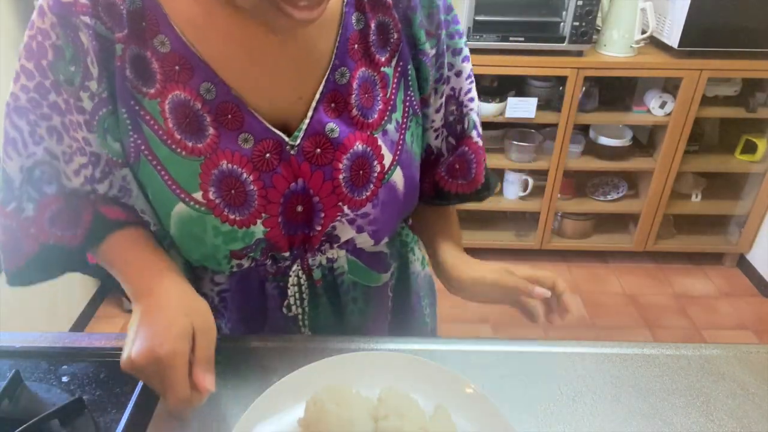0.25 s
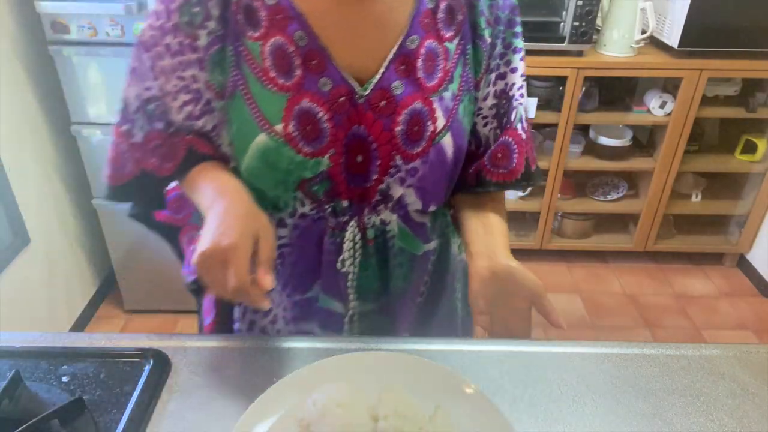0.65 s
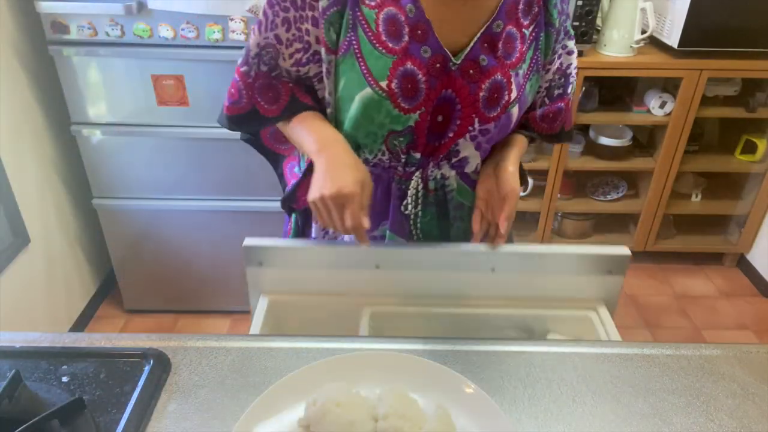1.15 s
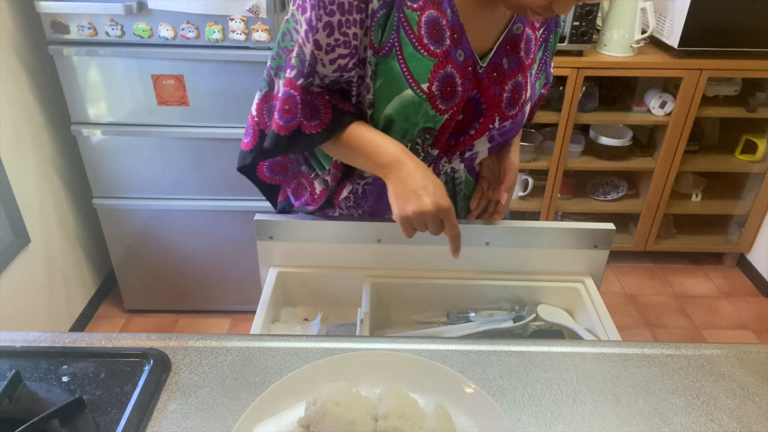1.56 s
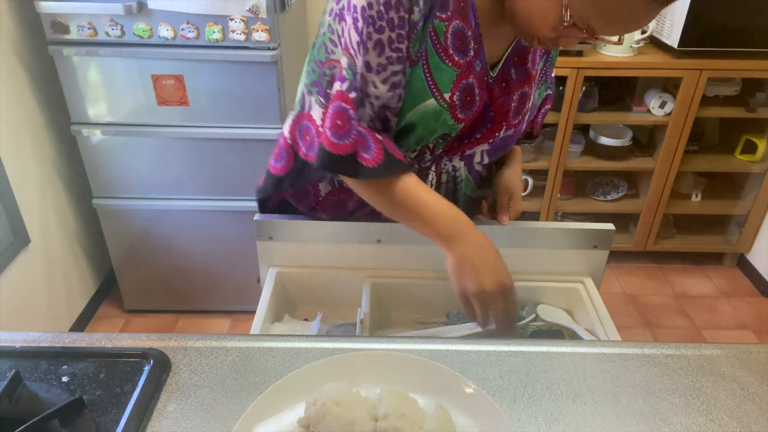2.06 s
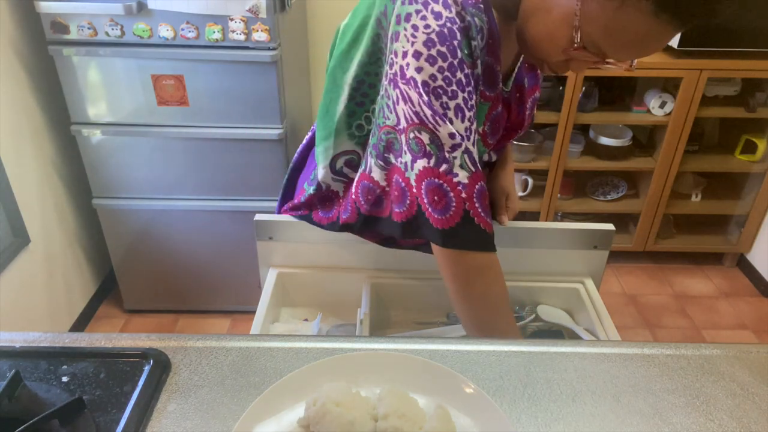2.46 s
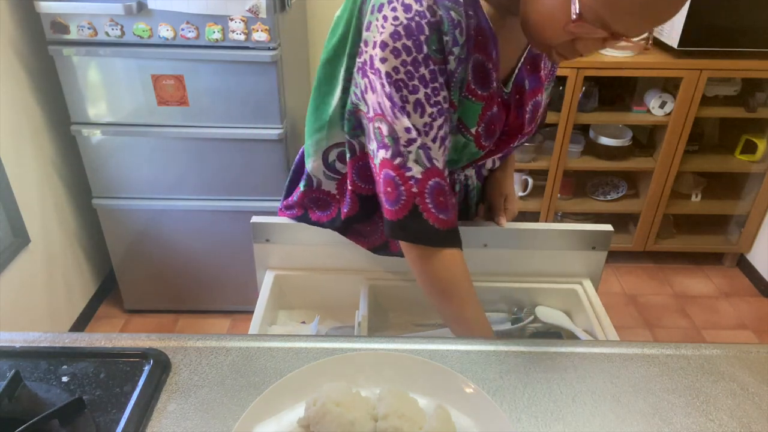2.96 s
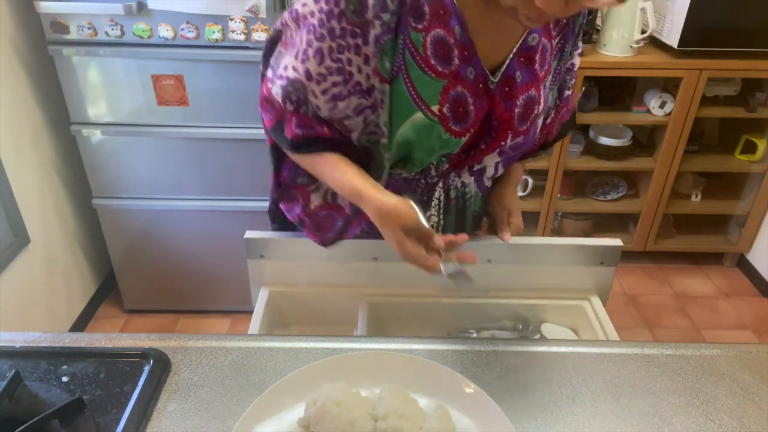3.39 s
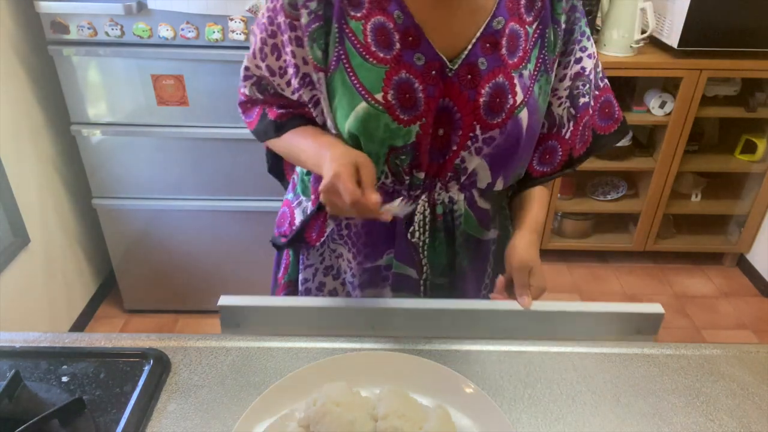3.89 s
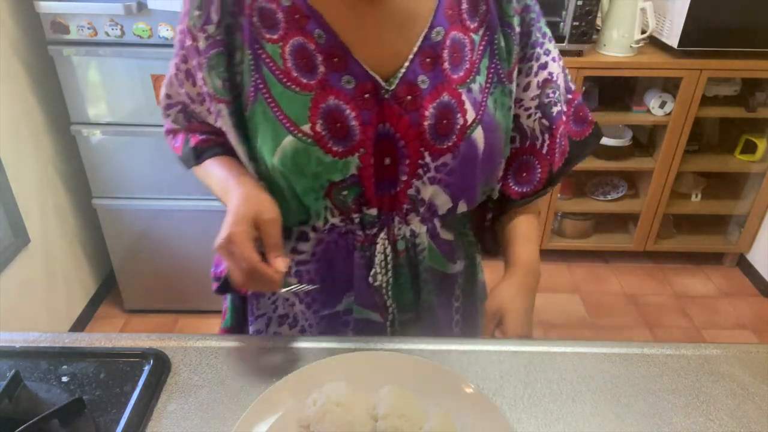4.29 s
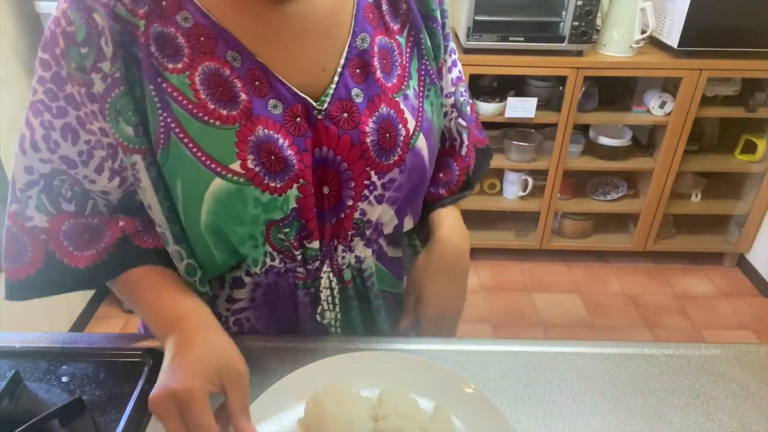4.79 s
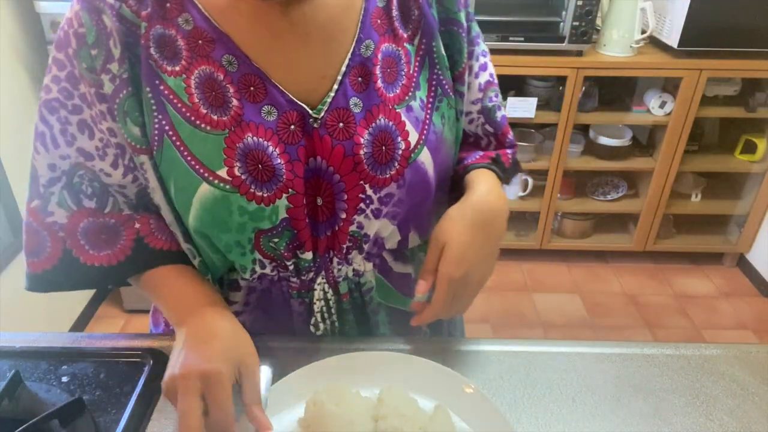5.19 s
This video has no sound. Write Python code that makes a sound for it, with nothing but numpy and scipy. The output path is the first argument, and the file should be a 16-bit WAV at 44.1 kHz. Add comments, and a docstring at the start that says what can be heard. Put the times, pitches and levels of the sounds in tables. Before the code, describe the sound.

A small home kitchen with quiet steady hiss, short diffuse echo and soft low shifts of weight. At about 0.3 s a drawer gets a dull knock with a small rattle, another at 0.56 s, then rolls open with low bumps from 0.8 to 1.2 s. Around 1.3-1.45 s it stops and the cutlery jolts in hard, loud clacks. It is nearly quiet until 2.3 s, when a hand rummages: clustered clatter and bright metal clinks, strongest near 2.45-2.65 s and again 2.9-3.1 s. From 3.4 s the drawer rumbles shut with small bumps and a utensil rattle at 3.8 s, closing in a solid double thud near 4.3 s. Soft footfalls follow. Close to the microphone, a fork taps and scrapes a ceramic plate at 4.83 and 4.96 s, clinks loudest with a brief glassy ring at 5.1 s, drags lightly, and taps again at 5.4 s.

```python
"""A kitchen drawer is knocked, rolled open and searched by hand; a fork comes out and the drawer shuts with a thud.
The fork then taps and scrapes a plate near the microphone, in a small room with soft footfalls and quiet hiss.
Blows, random clicks and noise ring damped resonances of cabinet, floor, cutlery, fork and plate.
Filtered clicks and blows add the tray's clatter, bright cracks and the scrape; filtered noise makes the hiss.
Noise tails that lose their treble first make the room echo."""
import sys
import numpy as np
from scipy import signal
from scipy.fft import rfft, irfft
from scipy.io import wavfile
from scipy.ndimage import uniform_filter1d

SR = 44100
rng = np.random.default_rng(int(sys.argv[2]) if len(sys.argv) > 2 else 0)


def wav_record(signal):
    """Record a signal, one row per channel, as 16-bit PCM in the file named by sys.argv[1]."""
    frames = np.transpose(np.atleast_2d(signal))
    bounded = np.clip(frames, -1, 1)
    # unit amplitude maps onto the largest positive 16-bit level
    quanta = np.round(bounded * 32767).astype(np.int16)
    wavfile.write(sys.argv[1], SR, quanta)


N = 239972
TIME = np.arange(N) / SR
SWELL_DB = 30  # the climb and the fall that rise and fall times refer to

# In all tables, t60/s is the time a ring takes to fade by 60 dB; levels come before the mix gains.
# resonances of drawer box and cabinet: f/Hz, level/dB, t60/s before each function shortens it
CABINET = [(169, -7, 0.235), (198.4, -2, 0.11), (266.3, 2.5, 0.063), (329.6, -7.5, 0.19), (357, -30.5, 0.1),
           (438, 1, 0.084), (572, -15, 0.35), (651, -1.5, 0.11), (720, -2, 0.17), (903, -23, 0.054),
           (1050, -5, 0.036), (1208, 5.5, 0.041), (1570, 13, 0.066)]
# resonances of the floor: f/Hz, level/dB, t60/s
FLOORBOARDS = [(64.7, 1.5, 0.13), (82.2, -4.5, 0.28), (100, -10.5, 0.078)]
# rollers while the drawer opens, then while it shuts: t/s, level/dB, favoured f/Hz
ROLL = [
    [(.6, -56, 330), (.65, -42, 322), (.74, -44.5, 199), (.91, -24, 230), (1.17, -24.5, 338),
     (1.26, -28.5, 218), (1.38, -47, 304), (1.5, -84, 302)],
    [(3.1, -59, 270), (3.35, -39.5, 225), (3.45, -35.5, 189), (3.56, -34.5, 194), (3.65, -31, 209),
     (3.78, -35, 250), (3.86, -30, 263), (3.98, -36, 258), (4.07, -36, 187), (4.26, -45.5, 206)],
]
# tone of a hard, bright contact: f/Hz, gain/dB
SPARK = [(1000, -27), (1800, -4), (2500, -2.5), (5800, -9), (8500, -16.5), (12400, -20), (15000, -16)]
# resonances of spoons and forks in the tray: f/Hz, level/dB, t60/s
CUTLERY = [(1024, -3, 0.036), (1482, 3, .05), (2390, -18, 0.061), (3093, -4, 0.13), (4200, -4, 0.057),
           (4730, 0, 0.067), (6100, -8, 0.056), (6820, -1, 0.032), (7330, -11, 0.12), (7500, -0.5, 0.18),
           (8760, -1.5, .06), (9730, -3, 0.032), (11550, -4.5, 0.12), (11800, -23, .04), (11900, -9, 0.087),
           (14300, -5, .04), (15800, -18, .04)]
# shifts of weight: peak t/s, level/dB, rise/s, fall/s, cabinet over floor/dB
STEPS = [(0, -25, .01, 0.095, -8), (.48, -41, 0.6, 1.5, -21), (1.39, -55, .1, 0.21, -9),
         (1.7, -61, 0.14, 0.18, -6), (1.96, -51.5, 0.27, 0.25, 5), (2.3, -46.5, 0.89, 1.1, -6),
         (2.84, -47, 0.12, 3, -4), (3.48, -48, 0.45, 0.19, -33), (3.83, -38.5, 0.061, 0.63, -17),
         (4.5, -36, 0.73, 0.57, -19.5), (5.041, -31, 0.079, 0.19, -34)]
# utensils sliding and tumbling: peak t/s, tray level/dB, rise/s, fall/s, clatter over tray/dB, steel over tray/dB
STIRS = [(0, -38, .01, 0.13, 0, -26), (.232, -57, 0.046, 0.077, -28, -16),
         (0.343, -23.5, 0.0054, .075, -9.5, -26), (.565, -54.5, .004, 0.27, 8, 6),
         (.685, -44, 0.028, 0.077, -9.5, -33), (0.771, -38, 0.011, 0.85, -13.5, -30),
         (1.12, -46, .1, .15, 4, -17), (1.31, -32, 0.11, 0.18, -10, -20),
         (1.339, -19, 0.0064, 0.11, -6.5, -15), (1.4, -26.5, 0.0043, 0.13, -1.5, -34),
         (1.432, -27.5, 0.031, 0.034, -8, -36), (1.74, -67.5, 0.25, 0.085, -4, 15),
         (1.97, -74, 0.17, 3.8, 9, 8), (2.284, -37, 0.0035, 0.74, -1.5, -17),
         (2.484, -31, 0.13, 0.3, 0, -10), (2.569, -32, 0.007, 0.2, -1.5, 5.5),
         (2.652, -23.5, 0.12, 0.18, -3, -5.5), (2.892, -44.5, 0.22, 0.53, 4.5, -24),
         (2.938, -24.5, 0.0057, 0.11, -13, -4), (3.047, -30.5, 0.21, 0.075, -5.5, -30),
         (3.069, -34.5, 0.058, 0.27, 1, -10), (3.2, -41, 0.043, 0.058, -16, -32),
         (3.295, -55, .003, 0.045, 2, 20), (3.792, -36, 0.012, 0.079, -4, -30),
         (3.821, -37, 0.013, 0.16, 0, -41), (4.061, -56, 0.1, 0.091, -20, -14),
         (4.12, -52.5, 0.18, 0.3, -6, -4), (4.338, -29, 0.045, 0.23, -3.5, -15.5)]


def undb(db):
    """Turn decibels into a plain gain."""
    return 10 ** (np.asarray(db) / 20)


def level(x, db):
    """Scale a sound so its average (rms) level is db."""
    return x * undb(db) / np.sqrt(np.mean(x ** 2))


def follow(tables, column):
    """One column of curve tables over time, and the gate that is open inside their spans."""
    out, gate = np.zeros(N), np.zeros(N)
    for table in map(np.array, tables):
        inside = (TIME >= table[0, 0]) & (TIME <= table[-1, 0])
        out[inside] = np.interp(TIME[inside], table[:, 0], table[:, column])
        gate[inside] = 1
    return out, gate


def envelope(tables):
    """Gain over time from the level column, silent outside the tables' spans."""
    db, gate = follow(tables, column=1)
    return undb(db) * gate


def swells(peak_s, db, rise_s, fall_s):
    """Sum of envelopes that climb SWELL_DB to each peak and fall away again."""
    out = np.zeros(N)
    for s, top, rise, fall in zip(*np.broadcast_arrays(peak_s, db, rise_s, fall_s)):
        late = TIME - s
        drop = np.maximum(-late / max(rise, .002), late / max(fall, .002))
        out += undb(top - SWELL_DB * drop)
    return out


def colour(x, spectrum):
    """Filter through (Hz, dB) points that never sounds early, from the cepstrum of the log gain."""
    hz, db = np.transpose(spectrum)
    log_hz = np.log(np.maximum(np.linspace(0, SR / 2, num=1025), 1))
    log_gain = np.interp(log_hz, np.log(hz), db) * np.log(10) / 20
    cepstrum = irfft(log_gain)
    # fold the backward half onto the forward half
    cepstrum[1:1024] *= 2
    cepstrum[1025:] = 0
    response = irfft(np.exp(rfft(cepstrum)))
    return signal.fftconvolve(x, response)[:len(x)]


def mode(force, hz, db, t60):
    """A damped resonance that radiates nothing at zero pitch."""
    r = np.exp(-np.log(1000) / (max(t60, .01) * SR))  # what is left after one sample
    w = 2 * np.pi * hz / SR
    return undb(db) * signal.lfilter([.5, 0, -.5], [1, -2 * r * np.cos(w), r * r], force)


def favour(hz, centre_hz, slope_db, most_db):
    """Gain that falls by slope_db per octave away from a favoured pitch, by most_db at most."""
    octaves = np.abs(np.log2(hz / np.maximum(centre_hz, 1)))
    return undb(-np.minimum(slope_db * octaves, most_db))


def clicks(rate, spread_db):
    """Random contacts of either sign and uneven strength, about rate per second; rms 1."""
    hit = rng.random(N) < rate / SR
    strength = rng.standard_normal(N) * undb(spread_db * rng.random(N))
    return level(hit * strength, 0)


def blow(chatter_s, rebound):
    """Force of one blow: a first contact, then random rebounds that die away."""
    t = TIME[:SR // 2]
    force = rebound * rng.laplace(size=len(t)) * np.exp(-(t / max(chatter_s, .001)) ** 2)
    force[0] = 1
    return force


def add(out, sound, s, db):
    """Mix a sound in at s with its peak at db."""
    i = int(s * SR)
    out[i:i + len(sound)] += (sound * undb(db) / np.abs(sound).max())[:N - i]


def floor():
    """Footfalls: soft shifts of weight push noise through the low floor resonances."""
    still_db = -70  # push on the floor at rest
    push = undb(still_db) + swells(*np.transpose(STEPS)[:4])
    force = rng.standard_normal(N) * push
    return undb(-34.5) * sum(mode(force, *m) for m in FLOORBOARDS)


def hiss():
    """Quiet steady air: noise with its treble turned down."""
    # tone of the air: f/Hz, gain/dB
    air_tone = [(71, -14), (120, 4), (535, -3), (668, -9), (1000, -7.5), (1250, -12), (2590, -13.5),
                (7400, -21.5), (15000, -37)]
    return level(colour(rng.standard_normal(N), air_tone), -60)


def drawer():
    """Soft bumps ring the cabinet; rollers, stirring hand and steps each favour their own pitch."""
    press_db, press_hz = -9, 316  # a stir also presses on the drawer box
    step_hz = 182  # pitch that a step favours in the cabinet
    bumps = level(uniform_filter1d(clicks(1200, spread_db=9), size=24), 0)
    s, db, rise, fall, cabinet_db = np.transpose(STEPS)
    roll_hz, _ = follow(ROLL, column=2)
    press = undb(press_db) * swells(*np.transpose(STIRS)[:4])
    step = swells(s, db + cabinet_db, rise, fall)
    loads = [(envelope(ROLL), roll_hz), (press, press_hz), (step, step_hz)]
    body = np.zeros(N)
    for hz, db, t60 in CABINET:
        push = sum(load * favour(hz, centre_hz, slope_db=31.5, most_db=22.0) for load, centre_hz in loads)
        body += mode(bumps * push, hz, db, 0.71 * t60)
    return undb(-37.5) * body


def stirring():
    """Drive of tray, clatter and steel: stirs, their settling, and shaking by the rollers."""
    ride_db, ride_slope, full_roll_db = -38, 1.16, -26  # level at full roll/dB, dB per dB of roll, full roll/dB
    ride_clatter_db, ride_steel_db = -9, -28  # over the tray
    settle_db, settle_s, settle_clatter_db = -24.5, 0.26, 7.5  # over the stir/dB, fall/s, extra clatter/dB
    s, db, rise, fall, clatter_db, steel_db = np.transpose(STIRS)
    roll_db, rolling = follow(ROLL, column=1)
    ride = rolling * undb(ride_db + ride_slope * (roll_db - full_roll_db))
    settle = swells(s, db + settle_db, rise, settle_s)
    settle_clatter = swells(s, db + settle_db + clatter_db + settle_clatter_db, rise, settle_s)
    push = swells(s, db, rise, fall) + settle + ride
    rattle = swells(s, db + clatter_db, rise, fall) + undb(ride_clatter_db) * ride + settle_clatter
    shimmer = swells(s, db + steel_db, rise, fall) + undb(ride_steel_db) * (ride + settle)
    return push, rattle, shimmer


def utensils():
    """Dense contacts thump the tray and spark in the treble; single collisions stand out."""
    # tone of the tray: f/Hz, gain/dB
    tray_tone = [(250, -35.5), (400, -9.5), (440, -4.5), (630, -4.5), (1080, 3), (1500, 1), (1800, -6.5),
                 (2400, -13), (3200, -16.5), (5300, -79.5)]
    # single collisions: t/s, level/dB (tray peaks 9 dB lower), treble over that level/dB, chatter/s
    clacks = [(0.501, -37, -10, 0.01), (0.769, -28.5, -15.5, 0.0092), (1.274, -25, -16, 0.011),
              (1.292, -21, -14, 0.048), (1.336, -7.5, -24, 0.0071), (1.399, -13, -25, 0.017),
              (1.425, -8, -18.5, 0.0056), (1.943, -42, -12, 0.013), (2.287, -36, -5, 0.01),
              (2.308, -26, 1, 0.0069), (2.392, -21, -13.5, 0.028), (2.436, -18.5, -9.5, 0.011),
              (2.458, -16.5, -8.5, 0.018), (2.473, -8.5, -18.5, 0.0085), (2.571, -15.5, -9, 0.033),
              (2.639, -12.5, -28, 0.012), (2.883, -20, -15, 0.019), (2.93, -18, -6.5, 0.035),
              (3.024, -13.5, -22, 0.044), (3.065, -14, -6.5, 0.019), (3.195, -32, -24, 0.011),
              (3.297, -42, 7.5, 0.0021), (3.791, -20.5, -24, 0.0099), (3.822, -19, -22.5, 0.021),
              (4.129, -41, -4, 0.015), (4.29, -33, -17, 0.03)]
    steel_hz = 7800  # clatter below, steel above
    force = clicks(3500, spread_db=-1)
    spark = colour(force, SPARK)
    steel = signal.sosfilt(signal.butter(4, steel_hz, "high", fs=SR, output="sos"), spark)
    clatter = signal.sosfilt(signal.butter(4, steel_hz, fs=SR, output="sos"), spark)
    push, rattle, shimmer = stirring()
    thump = level(colour(force, tray_tone), 0)
    out = undb(-9.5) * (push * thump + rattle * level(clatter, 0) + shimmer * level(steel, 0))
    # handles and bowls of many sizes each ring briefly at their own moments
    for hz in 700 * 2 ** np.sort(rng.uniform(0, 3.3, size=14)):
        drive = (rattle if hz > 2300 else push) * clicks(60, spread_db=9)
        out += mode(drive, hz, -39 - 2.5 * np.log2(hz / 1000), .035)
    for s, db, bright_db, chatter_s in clacks:
        force = blow(chatter_s, rebound=0.48)
        add(out, colour(force, tray_tone), s, db - 9)
        add(out, colour(force, SPARK), s, db + bright_db)
        # other pieces meet each time, so every pitch shifts a little
        shift = rng.uniform(.85, 1.02, len(CUTLERY))
        ring = sum(mode(force, k * hz, g, t60) for k, (hz, g, t60) in zip(shift, CUTLERY))
        add(out, ring, s, db + bright_db - 4.5)
    return out


def knocks():
    """Each blow or roller bump rings the cabinet, cracks on contact and booms in the floor."""
    # t/s, peak level/dB, favoured f/Hz, crack over peak/dB, floor boom over peak/dB, chatter/s
    cabinet_blows = [(.339, -18.5, 360, -8, -27, 0.006), (0.56, -18.5, 313, -10, -34, 0.01),
                     (0.863, -21.5, 171, -35, -16, 0.0028), (0.991, -22, 263, -35, -35, 0.0083),
                     (1.079, -21.5, 273, -25, -18, 0.0029), (1.186, -22.5, 282, -35, -19.5, 0.01),
                     (2.843, -28, 314, -14, -15, 0.013), (3.446, -27, 180, -36, -13, 0.0051),
                     (3.545, -23, 177, -27, -28, 0.0066), (3.641, -20.5, 235, -40, -25, 0.0037),
                     (3.918, -48, 260, -40, -37, 0.007), (4.271, -31.5, 163, -35, -27, 0.016),
                     (4.317, -14, 398, -22, -8, 0.017), (4.338, -13, 283, -24, -7.5, 0.025)]
    out = np.zeros(N)
    for s, db, centre_hz, crack_db, boom_db, chatter_s in cabinet_blows:
        # wood and plastic yield, so the push lasts half a cycle of the favoured pitch
        push = np.convolve(blow(chatter_s, rebound=.15), np.hanning(int(SR / centre_hz / 2)))
        body = sum(mode(push * favour(hz, centre_hz, slope_db=10, most_db=23), hz, g, 0.82 * t60)
                   for hz, g, t60 in CABINET)
        add(out, body, s, db)
        add(out, colour(blow(0.0026, rebound=1.0), SPARK), s, db + crack_db)
        # the heavy floor takes the blow up slowly
        slow_push = np.convolve(push, np.hanning(250))
        add(out, sum(mode(slow_push, *m) for m in FLOORBOARDS), s, db + boom_db)
    return out


def jingle():
    """Loose spoons and forks: every steel resonance chatters at its own moments."""
    # peak t/s, level/dB, fall/s, lean/dB per octave (held within 9 either way)
    shakes = [(0.563, -43, 0.081, -1.5), (.77, -59, .12, 3), (1.1, -59, 0.23, -8), (1.32, -38, .02, .1),
              (1.73, -65, 0.13, 4), (2.29, -60, 0.74, 5), (2.46, -48, 0.014, -5), (2.808, -44.5, .3, 3),
              (2.935, -42, 0.033, 6), (4.14, -59, 0.11, -6)]
    s, db, fall, lean = np.transpose(shakes)
    out = np.zeros(N)
    for hz, g, t60 in CUTLERY:
        top_db = db + np.clip(lean, -9, 9) * np.log2(hz / 8000)
        shake = swells(s, top_db, 0.013, fall)
        out += mode(shake * clicks(92, spread_db=3), hz, g, t60)
    return undb(-29.5) * out


def random_sign():
    """A random sign for each resonance, so that their peaks do not all line up."""
    return rng.choice([-1, 1])


def fork_on_plate():
    """Taps ring plate and fork, shorter where a hand or the resting fork damps them; dragging makes both buzz."""
    # plate resonances: f/Hz
    plate_hz = [725, 1351, 1986, 2390, 2778, 3719, 4371, 4655, 4910, 5780, 6228, 6984, 7348, 8355, 8850,
                9670, 11132, 11530, 12750, 13370, 14395, 15040]
    # ring of each plate resonance: level/dB, t60/s when free
    plate_ring = [(-11, 0.19), (-12.5, 0.61), (-11, 0.57), (-18, 0.43), (-14.5, 1), (-3, 0.32), (-39, .37),
                  (-3, 0.28), (-29, 0.25), (-4, 0.57), (-31, 0.28), (1, 0.22), (-20, 0.3), (-8, 0.25),
                  (-20, 0.23), (-14, 0.49), (-17, 0.48), (-17.5, 0.47), (-9.5, 0.29), (-18, 0.51),
                  (-18, 0.21), (-25, 0.31)]
    # fork resonances: f/Hz
    fork_hz = [1270, 1385, 2476, 2820, 2955, 3435, 3620, 3678, 3771, 4710, 4823, 5679, 6309, 7025, 7887,
               8398, 10300, 13737, 15250]
    # ring of each fork resonance: level/dB, t60/s when free
    fork_ring = [(-46, 0.42), (1.5, 0.055), (-13, 0.44), (-5, 0.26), (-14, 0.35), (-14, 0.16), (-7.5, 0.29),
                 (-9, 0.13), (-33, 0.28), (-10.5, 0.15), (-1, 0.077), (-20, .11), (-6, 0.24), (-31, 0.11),
                 (-11.5, 0.15), (-27, .14), (-16, 0.15), (-7, 0.15), (-13, 0.092)]
    # fork on plate: t/s, plate peak/dB, fork over plate/dB, plate lean/dB per octave, free ringing 0-1, chatter/s
    taps = [(4.826, -18, 5, 0, 0.24, 0.011), (4.962, -16, 1, -2.5, 0.12, 0.018),
            (5.1075, -5, -7, 0.5, 0.29, 0.0028), (5.127, -12, -6, 4.5, 0.92, 0.0046),
            (5.347, -39, 11.5, -4.5, 1, 0.006), (5.410, -22.5, 0, 1, 0.2, 0.013)]
    # tines dragged over the glaze: peak t/s, level/dB, rise/s, fall/s
    scrapes = [(4.838, -19.5, 0.018, 0.055), (4.88, -38.5, .05, 0.28), (5.098, -20, 0.044, 0.02),
               (5.138, -20.5, 0.022, 0.62), (5.33, -59, 0.2, 0.54), (5.407, -18.5, 0.075, 0.045)]
    # tone of the glaze: f/Hz, gain/dB
    glaze_tone = [(400, -26), (900, -32), (2000, 0.5), (3600, 5.5), (5000, -5.5), (8500, -10), (9300, -18),
                  (13000, -33), (16000, -6)]
    out = np.zeros(N)
    plate = [(hz, *ring) for hz, ring in zip(plate_hz, plate_ring)]
    fork = [(hz, *ring) for hz, ring in zip(fork_hz, fork_ring)]
    for s, db, fork_db, lean, free, chatter_s in taps:
        force = blow(chatter_s, rebound=0.062)
        plate_sound = sum(random_sign() * mode(force, hz, g + lean * np.log2(hz / 4000), free * t60)
                          for hz, g, t60 in plate)
        fork_sound = sum(random_sign() * mode(force, hz, g, free * t60) for hz, g, t60 in fork)
        add(out, plate_sound, s, db)
        add(out, fork_sound, s, db + fork_db)
        add(out, colour(blow(chatter_s, rebound=0.86), glaze_tone), s, db - 6)
    drag = clicks(4000, spread_db=18)
    push = swells(*np.transpose(scrapes))
    # contact damps the rings to 0.12 of their free length
    buzz = sum(mode(drag * push, hz, g, 0.12 * t60) for hz, g, t60 in plate + fork)
    scrape = push * level(colour(drag, glaze_tone), -15.5)
    return out + undb(-39.5) * buzz + scrape


def room(x):
    """Diffuse echo: noise tails in wide overlapping bands, the highest treble dying first."""
    # echo of each band: middle f/Hz, t60/s
    echo_bands = [(150, 0.3), (500, 0.45), (1500, 0.41), (4500, 0.29), (12000, 0.25)]
    t = TIME[:SR // 2]
    tail = np.zeros(len(t))
    for hz, t60 in echo_bands:
        edges = [hz / np.sqrt(3), min(hz * np.sqrt(3), .45 * SR)]
        band = signal.butter(2, edges, "band", fs=SR, output="sos")
        tail += signal.sosfilt(band, rng.standard_normal(len(t))) * undb(-60 * t / t60)
    # the echo starts after 3 ms and fades in
    tail *= np.clip((t - .003) / 0.0035, 0, 1)
    return signal.fftconvolve(x, tail / np.sqrt(np.sum(tail ** 2)))[:N]


def scene():
    """Drawer sounds and the nearer plate, each with its share of echo, over floor and hiss."""
    far = knocks() + drawer() + utensils() + jingle()
    near = fork_on_plate()
    echo = room(undb(-9.5) * far + undb(-6.0) * near)
    return (far + near + echo + floor() + hiss())[None]


def record(dry):
    """The microphone loses the deepest bass and the top is cut."""
    bass_cut = signal.butter(8, 47, "high", fs=SR, output="sos")
    top_cut = signal.ellip(8, .2, 75, 15700, fs=SR, output="sos")
    return signal.sosfilt(top_cut, signal.sosfilt(bass_cut, dry))


dry = scene()
out = record(dry)
wav_record(out)
```